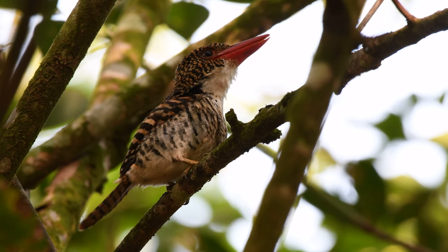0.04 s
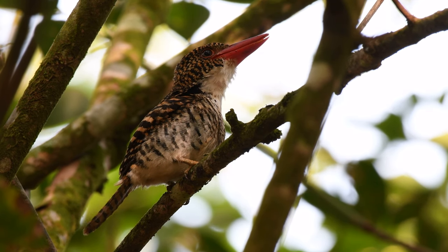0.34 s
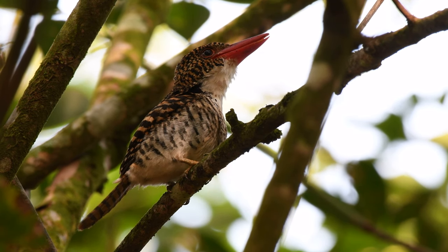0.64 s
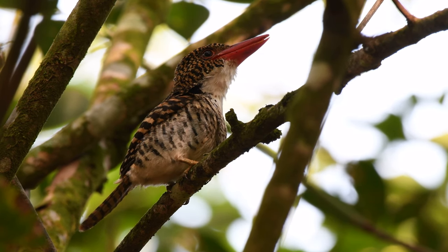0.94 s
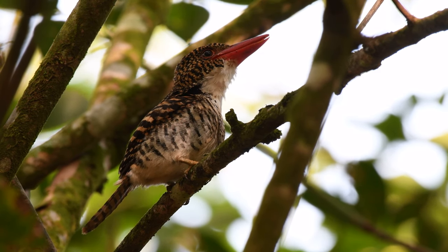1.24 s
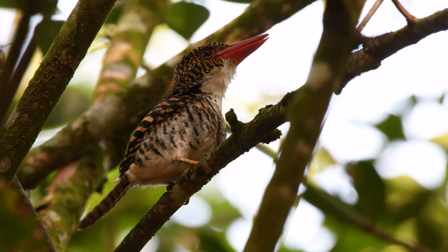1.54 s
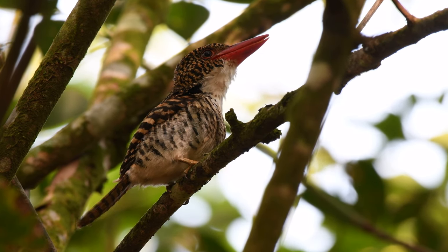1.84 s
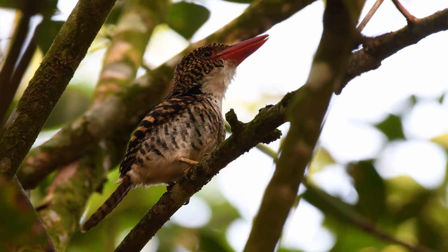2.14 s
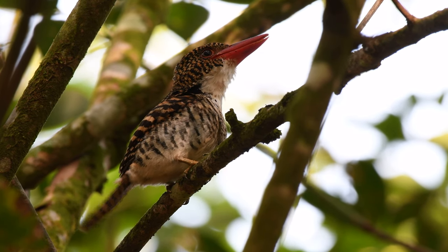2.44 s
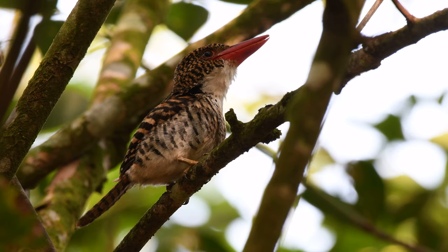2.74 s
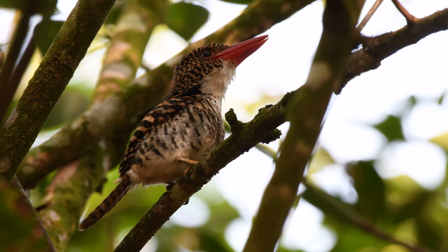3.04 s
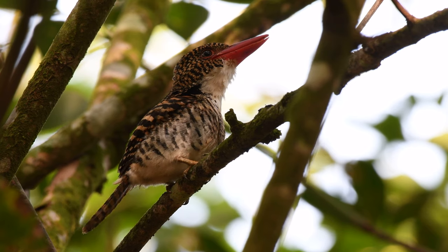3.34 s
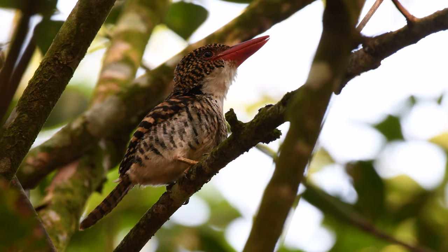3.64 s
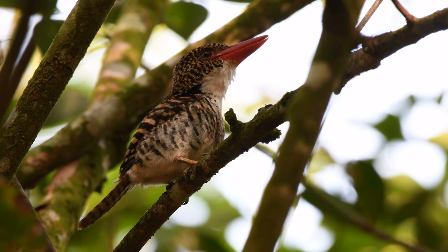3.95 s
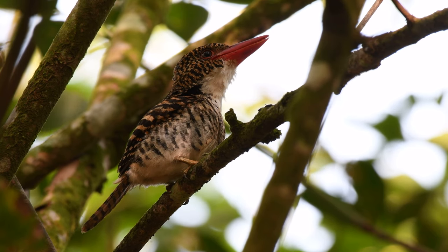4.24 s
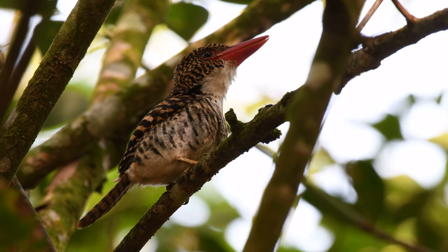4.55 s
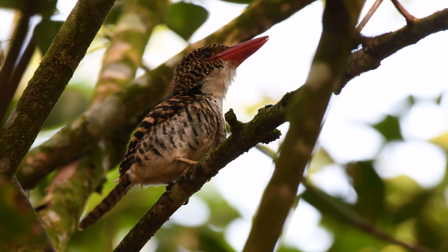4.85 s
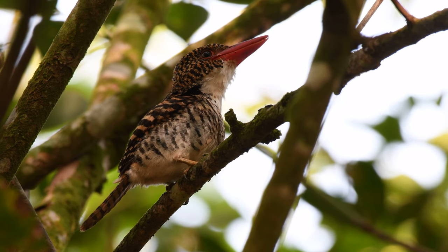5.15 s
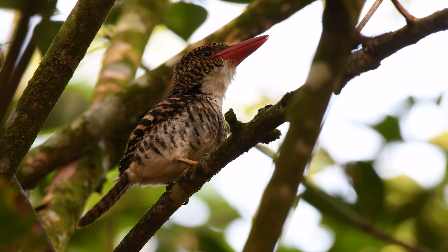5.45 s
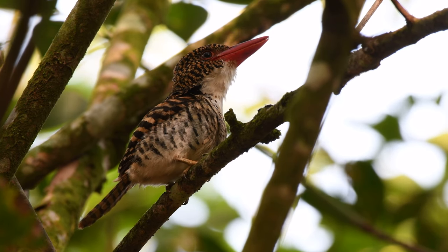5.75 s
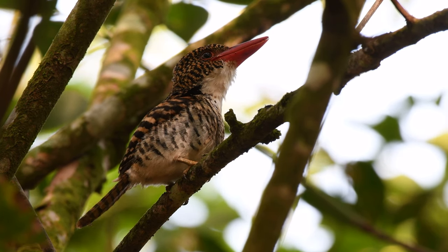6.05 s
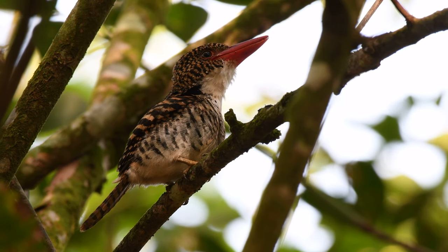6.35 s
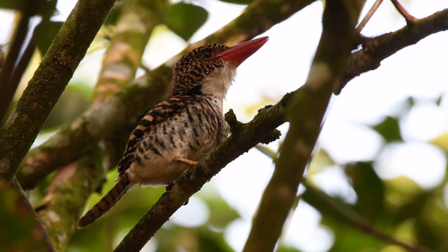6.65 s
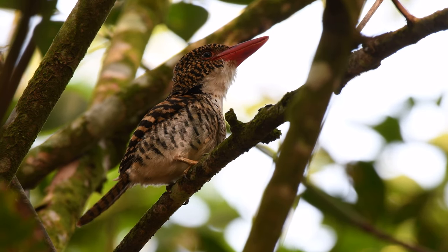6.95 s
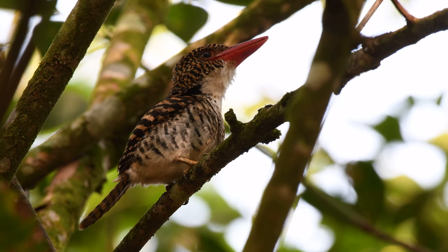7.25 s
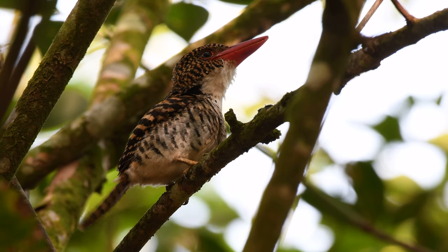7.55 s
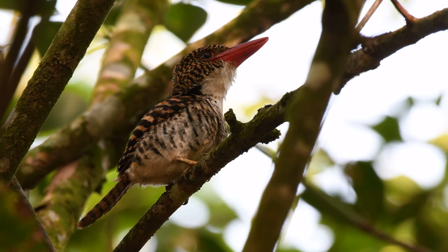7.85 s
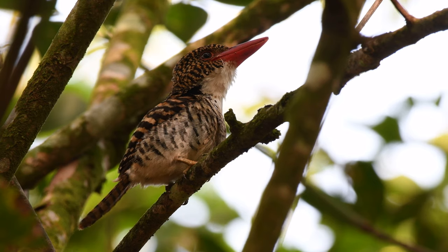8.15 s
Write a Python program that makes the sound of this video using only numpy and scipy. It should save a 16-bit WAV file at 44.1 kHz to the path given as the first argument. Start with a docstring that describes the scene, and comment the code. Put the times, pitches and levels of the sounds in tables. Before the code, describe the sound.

A kingfisher repeats loud rising whistles and short arched notes outdoors, over faint crickets, buzzing insects and distant birds.

```python
"""A kingfisher repeats a two-part call: a long rising whistle that drops away, and a short arched note.
Its syrinx is a harmonic source, its throat and bill a fixed filter; trunks and leaves scatter the sound.
Crickets chirp by stridulation over a buzzing insect chorus, and a dove and other birds call far off.
Beneath them lie a few dry clicks and the soft broadband wash of the forest."""
import sys
import numpy as np
from scipy import signal
from scipy.fft import rfft, irfft, next_fast_len
from scipy.io import wavfile
from scipy.ndimage import uniform_filter1d

SR = 44100
rng = np.random.default_rng(int(sys.argv[2]) if len(sys.argv) > 2 else 0)


def output_pcm(signal):
    """Save a mono or channel-first signal as 16-bit PCM at the path in sys.argv[1].

    Samples are clipped to [-1, 1] before scaling.
    """
    pcm = np.clip(np.atleast_2d(signal).T, -1, 1) * 32767
    wavfile.write(sys.argv[1], SR, np.round(pcm).astype(np.int16))


N = 370440

# Each row: start in seconds, length until the drop in seconds, top pitch in Hz.
WHISTLES = [(.716, .23, 2084), (1.626, 0.25, 2090), (2.543, .283, 2079), (3.511, 0.29, 2066),
            (4.498, 0.32, 2043), (5.524, .339, 2025), (6.589, 0.35, 2001), (7.647, .381, 1990)]
# Each row: start of the crest in seconds, its length in seconds, top pitch in Hz.
ARCHES = [(.02, 0.19, 2110), (1.077, 0.058, 2160), (2.02, 0.042, 2152), (2.978, 0.04, 2144),
          (3.969, 0.036, 2137), (4.992, 0.027, 2122), (6.051, .027, 2110), (7.133, 0.028, 2077),
          (8.226, 0.025, 2060)]
def kingfisher(flutter_db=.84, flutter_hz=20):
    """Interference: the gliding whistles and arches beat against their own echoes."""
    voice = np.zeros((2, N))
    for row in WHISTLES:
        add(voice, *whistle(*row))
    for row in ARCHES:
        add(voice, *arch(*row))
    fundamental, overtones = voice * gain_of(flutter_db * noise_band(N, 0, flutter_hz))
    tone = forest(fundamental, near_db=-8.7, far_db=-17.8, near_t60=.39, far_t60=1.5)
    # more of the overtones than of the fundamental arrives as echo
    return tone + forest(overtones, near_db=0, far_db=-6, near_t60=.3, far_t60=2)


SOURCE_DB, TIRING_DB_PER_S = -38, .23  # ahead of the throat filter
SLACK_RATIO, RELEASE_S = .62, .06  # slack pitch over held pitch; length of a note's fade
def whistle(s, length, top_hz, sag_s=.055, hold_s=.015, attack_s=.016):
    """Frequency modulation: the pitch flicks high, sags, climbs as the note swells, then drops."""
    t = np.arange(0, length + RELEASE_S, 1 / SR)
    climb = np.clip((t - sag_s) / (length - sag_s - hold_s), 0, 1)
    # the bird tires over the series: smaller flicks, straighter climbs, softer notes
    flick = (.118 - .0065 * s) * np.exp(-((t - .01093) / .019) ** 2)
    sag = .087 * (1 - climb) ** max(1.55 - .07 * s, .5)
    drop, release_db = let_go(t - length, drop_s=.05)
    hz = top_hz * (1 + flick - sag) * drop
    onset_db = -16.5 * np.exp(-t / attack_s)
    db = SOURCE_DB - TIRING_DB_PER_S * s + onset_db + 1.5 * climb + release_db
    return throat_note(np.c_[s + t, hz], np.c_[s + t, db], pressed_s=s + .038)


def arch(s, length, top_hz, lead_s=.08, swoop_s=.033, droop_hz_per_s2=2400):
    """Pitch follows tension: the slack voice swoops up, holds a drooping crest and drops again."""
    t = np.arange(-lead_s, length + RELEASE_S, 1 / SR)
    swoop = SLACK_RATIO + (1 - SLACK_RATIO) / (1 + (np.minimum(t - .005, 0) / swoop_s) ** 2)
    drop, release_db = let_go(t - length, drop_s=.062)
    hz = (top_hz - droop_hz_per_s2 * np.maximum(t, 0) ** 2) * swoop * drop
    swell_db = 228 * np.minimum(t, 0) + 1.5 * np.clip(t / length, 0, 1)
    db = SOURCE_DB - TIRING_DB_PER_S * s + swell_db + release_db
    bright_db = 2.5 + .0294 * (top_hz - 2100)  # higher arches are brighter
    return throat_note(np.c_[s + t, hz], np.c_[s + t, db], pressed_s=s, bright_db=bright_db)


def let_go(past_s, drop_s, lead_s=.01):
    """Relaxation of the syrinx ends each note: returns the falling pitch ratio and the level in dB."""
    fall = np.sin(np.pi / 2 * np.clip((past_s + lead_s) / drop_s, 0, 1)) ** 2
    release_db = -19 * (np.maximum(past_s, 0) / RELEASE_S) ** 1.42
    return 1 - (1 - SLACK_RATIO) * fall, release_db


# Transmission of throat and bill. Each row: frequency in Hz, gain in dB.
THROAT_RESPONSE = [(1300, -18), (1650, -11.5), (1950, -0.5), (2250, -2.5), (2500, -22), (4000, -41.5),
                   (5000, -47), (5700, -32.5), (6500, -30.5), (7000, -35.5), (8300, -44.5), (9300, -65.5),
                   (12300, -61), (14000, -75.5)]
def throat_note(pitch, level, pressed_s, bright_db=0):
    """Source and filter: syrinx harmonics pass a fixed throat, giving a fundamental and overtones."""
    s, hz, phase, amplitude = glide(pitch, level, waver=.0042, waver_hz=35.6)
    partials = []
    for k in range(1, 8):
        db = read(THROAT_RESPONSE, k * hz) + bright_db * max(k - 3, 0)
        partials.append(amplitude * gain_of(db) * np.sin(k * phase))
    # overtones flicker, and bloom only as the bird presses the note
    since = s + np.arange(len(hz)) / SR - pressed_s
    bloom = np.clip(1 + since / .025, 0, 1) * gain_of(1.2 * noise_band(len(hz), 0, 30))
    tension = (hz / hz.max()) ** 4  # the highest overtones vanish first as the pitch falls
    overtones = bloom * (sum(partials[1:4]) + tension * sum(partials[4:]))
    return s, np.array([partials[0], overtones])


# Spells of the near cricket. Each row: start in seconds, end in seconds, level in dB.
CRICKET_SPELLS = [(.01, 2.18, -67.5), (2.2, 2.9, -75.5), (2.94, 5.18, -68.5), (5.199, 5.5, -78),
                  (5.53, 8.39, -68.5)]
# Runs of thin double chips. Each row: start in seconds, end in seconds, level of the second chip in dB.
CHIP_RUNS = [(1.26, 1.65, -74.5), (2.106, 2.5, -72.5), (2.924, 3.05, -72.5), (4.67, 5.6, -75),
             (5.696, 7.1, -79.5), (7.29, 7.9, -76.5)]
def crickets(pairs_per_s=18.3, pair_gap_s=.017, chip_period_s=.258):
    """Stridulation: paired wing strokes each fall in pitch; higher double chips sound in even runs."""
    strokes, chips = np.zeros(N), np.zeros(N)
    for start, end, db in CRICKET_SPELLS:
        for s in np.arange(start, end, 1 / pairs_per_s):
            s += rng.normal(0, .0012)
            for delay, hz in ((0, 4880), (pair_gap_s, 4800)):
                stroke = sweep(.017, hz, hz * .86, octave_db=-27)
                add(strokes, s + delay, gain_of(db + rng.normal(0, .64)) * stroke)
    chip = sweep(.028, 5650, 4700, octave_db=-40)
    for start, end, db in CHIP_RUNS:
        for s in np.arange(start, end, chip_period_s):
            add(chips, s, gain_of(db - 3) * chip)
            add(chips, s + .039, gain_of(db) * chip)
    return forest(strokes, near_db=-10.5, far_db=-14) + forest(chips, near_db=-4, far_db=-7)


# Each row: start in seconds, length of the climb in seconds, its first and last pitch in Hz,
# relative level in dB.
UPSLURS = [(2.53, .16, 3265, 3590, -62.5), (7.332, 0.19, 3283, 3550, -63.5)]
def upslurs():
    """Reverberant field: a distant bird's slow climb and upward flick arrive mostly as echo."""
    out = np.zeros(N)
    for s, length, first, last, db in UPSLURS:
        end = s + length
        pitch = [(s, first), (s + .4 * length, first * 1.01), (end, last), (end + .04, last * 1.15)]
        level = [(s, db - 6.5), (end - .04, db), (end, db - 7),
                 (end + .029, db - 10), (end + .06, db - 18.5)]
        add(out, *pure_note(pitch, level))
    return gain_of(-1) * forest(out, near_db=-.5, far_db=1, near_t60=.72, far_t60=1.4)


# Each row: start in seconds, end in seconds, held pitch in Hz, level in dB.
COOS = [(1.282, 1.735, 403, -70), (3.253, 3.737, 403, -70), (5.22, 5.711, 407.4, -69),
        (7.228, 7.661, 403.6, -69)]
def dove():
    """Pure tone: each coo is a low sinusoid that swells as it rises to its held pitch."""
    out = np.zeros(N)
    for s, end, hz, db in COOS:
        pitch = [(s, hz * .975), (s + .25, hz), (end, hz)]
        level = [(s, db - 12.5), (s + .28, db), (end - .04, db - 1.5), (end, db - 8)]
        add(out, *pure_note(pitch, level))
    return forest(out, near_db=-12, far_db=-25.5)


# Each row: start in seconds, end in seconds, nominal pitch in Hz, notes per second, relative level in dB.
NOTE_RUNS = [(5.84, 6.1, 2340, 14, -73), (1.7, 2.05, 3450, 15, -82), (2.1, 2.53, 3380, 15, -80.5),
             (4.8, 8.7, 1600, 13, -88)]
# Each row: start in seconds, centre frequency in Hz, relative level in dB.
CHUCKLES = [(.12, 955, -72.5), (2.72, 995, -72), (5.29, 975, -71)]
# Each entry: delay of one note within a chuckle in seconds.
CHUCKLE_DELAYS = [0, .15, .225, .3, .43]
def far_birds():
    """Temporal smearing: reverberation blurs runs of short notes and hoarse, noisy chuckles."""
    calls = np.zeros(N)
    for start, end, hz, per_s, db in NOTE_RUNS:
        for s in np.arange(start, end, 1 / per_s):
            note = sweep(.06, hz * 1.02, hz * rng.uniform(.91, 1), octave_db=-39)
            add(calls, s, gain_of(db) * note)
    puff = np.hanning(int(.065 * SR))
    for s, hz, db in CHUCKLES:
        for delay in CHUCKLE_DELAYS:
            add(calls, s + delay, gain_of(db) * puff * noise_band(len(puff), hz, 77))
    return gain_of(2.5) * forest(calls, near_db=-3.5, far_db=-3.5)


# Each row: centre frequency in Hz, half width in Hz, level in dB.
CHORUS_BANDS = [(4574, 253, -70.5), (6067, 310, -73.5)]
# Each row: start in seconds, end in seconds, pitch in Hz, level in dB.
WHINES = [(0, .3, 6000, -72), (1.093, 1.8, 6060, -71.5), (2.448, 3.312, 6010, -73),
          (4.083, 4.855, 6000, -74), (5.603, 6.245, 6060, -72.5), (7.194, 8.102, 6025, -76)]
def insect_chorus():
    """Incoherent summation: countless far insects merge into two bands; a nearer one whines in spells."""
    out = sum(gain_of(db) * noise_band(N, hz, width) for hz, width, db in CHORUS_BANDS)
    for start, end, hz, db in WHINES:
        size = int((end - start) * SR)
        add(out, start, gain_of(db) * signal.windows.tukey(size, .4) * noise_band(size, hz, 29))
    return out


# Each row: start in seconds, relative level in dB, time to decay by 60 dB in seconds,
# centre frequency in Hz, half width in Hz.
CLICKS = [(1.555, -77.5, .12, 9000, 1900), (2.478, -73, .015, 9000, 1760),
          (3.964, -51.5, 0.028, 2876, 4370), (3.992, -55.5, 0.036, 3000, 4060),
          (7.201, -54.5, 0.0079, 8300, 1600)]
def clicks(band_hz=(260, 13000)):
    """Small sources radiate little bass: tiny dry snaps among the leaves decay exponentially."""
    out, t = np.zeros(N), np.arange(SR // 5) / SR
    for s, db, t60, hz, width_hz in CLICKS:
        add(out, s, gain_of(db - 60 * t / t60) * noise_band(len(t), hz, width_hz))
    band = signal.butter(2, band_hz, "bandpass", fs=SR, output="sos")
    return forest(signal.sosfilt(band, out), near_db=-4, far_db=-23.5)


# Each row: frequency in Hz, relative spectral density in dB.
AIR_SPECTRUM = [(25, -28), (55, -23), (100, -11), (170, -2.5), (260, -3), (600, 1), (1100, -1.5),
                (1700, -4.5), (2400, -8), (3800, -12), (5400, -16), (7200, -18.5), (8400, -27),
                (10000, -30.5), (14500, -35)]
# Each row: frequency in Hz, correlation of left and right from 0 to 1.
AIR_COHERENCE = [(30, 0.5), (300, 0.88), (700, 0.65), (1500, 0.56), (5000, 0.85), (8000, 0.9), (12000, .3)]
def air(level_db=-67, swell_db=.45):
    """Partial coherence: the soft wash of the forest is only partly alike at the two ears."""
    hz = np.fft.rfftfreq(N, 1 / SR)
    left, independent = rfft(rng.standard_normal((2, N))) * gain_of(read(AIR_SPECTRUM, hz))
    coherence = np.clip(read(AIR_COHERENCE, hz), -1, 1)
    right = coherence * left + np.sqrt(1 - coherence ** 2) * independent
    wash = unit_rms(irfft(np.array([left, right]), N))
    return gain_of(level_db + swell_db * noise_band(N, 0, 2)) * wash


def forest(x, near_db, far_db, near_t60=.18, far_t60=1.2):
    """Scattering: direct sound, quick echoes off near trunks and leaves, and a tail from far trees."""
    t = np.arange(int(1.5 * SR)) / SR
    response = (t == 0) * 1.
    for db, t60, echoes_per_s in ((near_db, near_t60, 500), (far_db, far_t60, 2000)):
        signs = rng.choice([-1, 1], len(t))
        arrivals = (rng.random(len(t)) < echoes_per_s / SR) * (t > .004)
        echoes = signs * arrivals * gain_of(-60 * t / t60)
        response += gain_of(db) * echoes / np.linalg.norm(echoes)
    return signal.fftconvolve(x, response)[:N]


def glide(pitch, level, waver=.003, waver_hz=50):
    """Phase is the integral of frequency: an unsteady note through (s, Hz) and (s, dB) points."""
    t = np.arange(max(level[0][0], 0), level[-1][0], 1 / SR)
    hz = uniform_filter1d(np.interp(t, *np.transpose(pitch)), size=400)
    hz *= 1 + waver * noise_band(len(t), 0, waver_hz)
    phase = 2 * np.pi * np.cumsum(hz) / SR
    db = np.interp(t, *np.transpose(level))
    amplitude = np.sqrt(2) * gain_of(db) * signal.windows.tukey(len(t), .01)
    return t[0], hz, phase, amplitude


def pure_note(pitch, level):
    """A glide heard as a single sinusoid."""
    s, _, phase, amplitude = glide(pitch, level)
    return s, amplitude * np.sin(phase)


def sweep(length, from_hz, to_hz, octave_db):
    """Linear chirp: one short pulse with a weak second harmonic."""
    hz = np.linspace(from_hz, to_hz, int(length * SR))
    phase = 2 * np.pi * np.cumsum(hz) / SR
    return unit_rms(np.hanning(len(hz)) * (np.sin(phase) + gain_of(octave_db) * np.sin(2 * phase)))


def noise_band(size, hz, width_hz):
    """Noise with a Gaussian spectrum; centred on zero it is a slow random waver."""
    padded = 2 * next_fast_len(size)
    bell = np.exp(-.5 * ((np.fft.rfftfreq(padded, 1 / SR) - hz) / width_hz) ** 2)
    return unit_rms(irfft(bell * rfft(rng.standard_normal(padded)))[:size])


def gain_of(db):
    """Decibels to an amplitude ratio."""
    return 10 ** (np.asarray(db) / 20)


def unit_rms(x):
    """Normalisation to unit power."""
    return x / np.sqrt(np.mean(x ** 2) + 1e-20)


def read(points, hz):
    """Interpolation along a log-frequency axis."""
    f, value = np.transpose(points)
    return np.interp(np.log(hz + 1), np.log(f + 1), value)


def add(mix, s, sound):
    """Superposes a sound on the mix at s seconds."""
    part = mix[..., max(round(s * SR), 0):][..., :sound.shape[-1]]
    part += sound[..., :part.shape[-1]]


def scene():
    """Superposition: birds and insects straight ahead, in the wider wash of the forest."""
    return air() + kingfisher() + upslurs() + dove() + far_birds() + crickets() + insect_chorus() + clicks()


def record(dry, cutoff_hz=14900):
    """Band limiting: a steep low-pass filter removes the highest treble."""
    lowpass = signal.firwin(511, cutoff_hz, window=("kaiser", 9), fs=SR)
    return signal.oaconvolve(dry, lowpass[None], "same", axes=1)


dry = scene()
out = record(dry)
output_pcm(out)
```